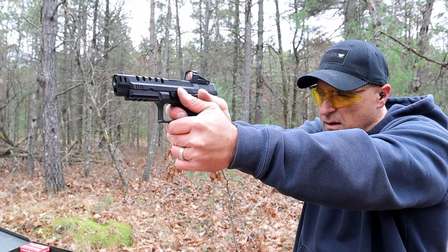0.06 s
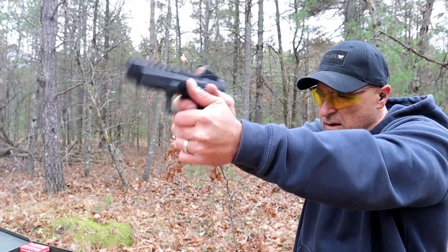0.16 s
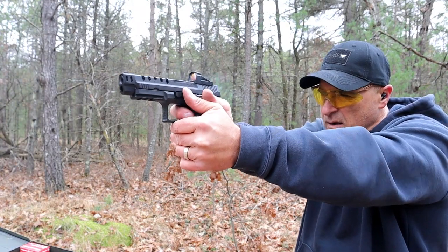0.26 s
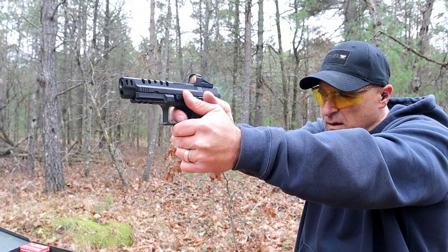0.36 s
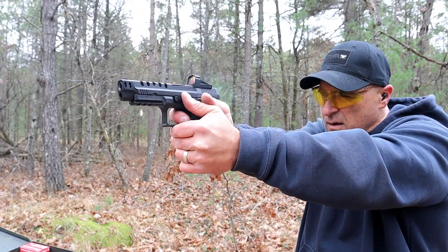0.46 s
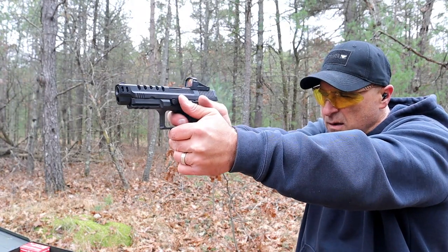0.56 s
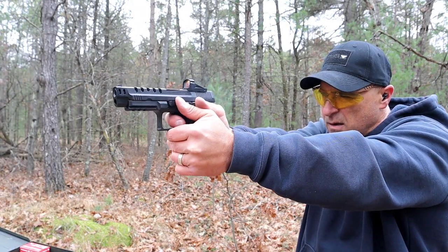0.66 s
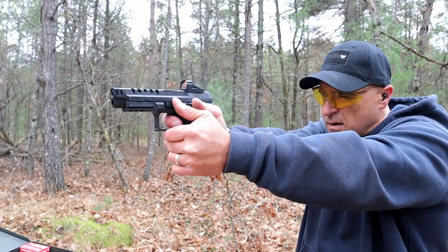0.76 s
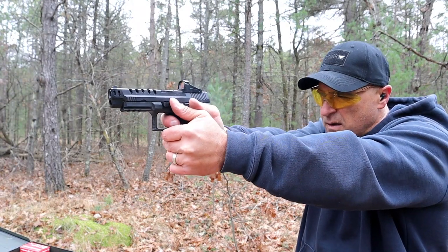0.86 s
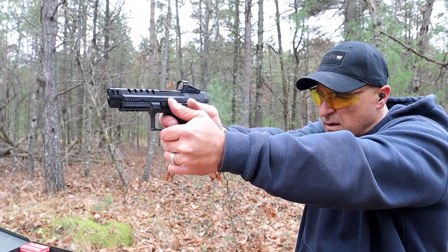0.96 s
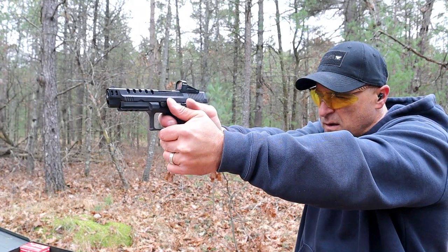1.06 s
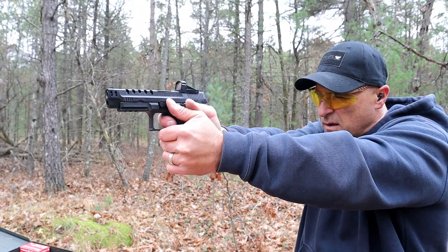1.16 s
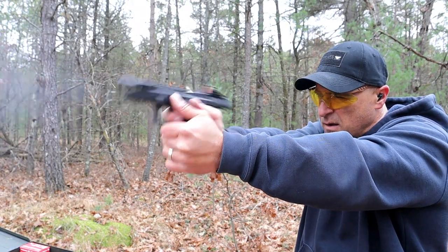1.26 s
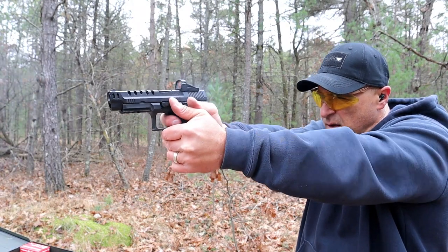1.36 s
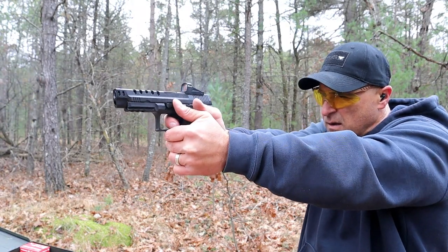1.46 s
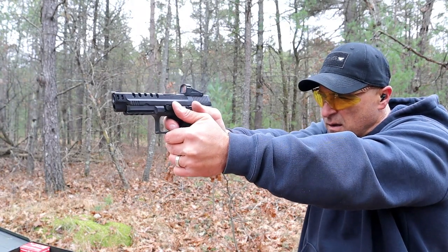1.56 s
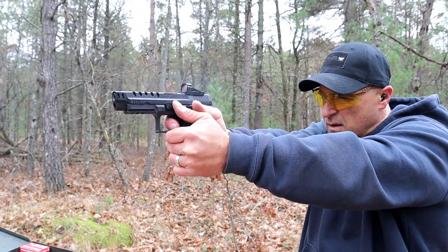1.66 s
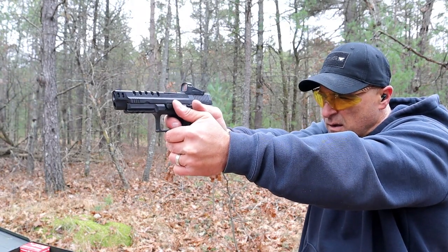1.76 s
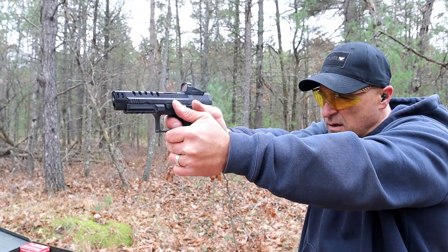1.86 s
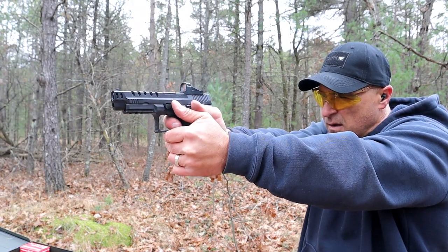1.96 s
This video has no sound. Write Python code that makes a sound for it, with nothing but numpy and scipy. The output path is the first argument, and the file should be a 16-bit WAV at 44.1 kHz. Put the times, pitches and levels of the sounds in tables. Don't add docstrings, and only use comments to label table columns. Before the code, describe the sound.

Two loud pistol shots, just over a second apart, crack close to an overloading microphone in the woods; each is followed by a slide clack, a bright steel plate ring and a long patchy echo.

```python
import sys
import numpy as np
from scipy import signal
from scipy.io import wavfile

SR = 44100
rng = np.random.default_rng(int(sys.argv[2]) if len(sys.argv) > 2 else 0)


def volts(x):
    e = np.asarray(x, float) / 20
    return 10 ** e


def persist_wave(psi):
    counts = np.round(np.clip(psi, -1, 1) * 32767).astype(np.int16)
    wavfile.write(sys.argv[1], SR, np.atleast_2d(counts).T)


N = 90405

# start in seconds, level of the forest echo in dB.
SHOTS = [
    (0.219, -12),
    (1.3685, -13),
]


def at_hz(points, hz):
    table_hz, values = np.transpose(points)
    return np.interp(np.log(hz), np.log(table_hz), values)


def since(start_s):
    t = np.arange(N) / SR - start_s
    return np.maximum(t, 0), t >= 0


def band(x, low_hz, high_hz):
    sos = signal.butter(3, [low_hz, min(high_hz, .45 * SR)], "band", fs=SR, output="sos")
    return signal.sosfilt(sos, x)


def drift(rate_hz):
    r = np.exp(-80 * np.pi * rate_hz / SR)
    chance = rng.standard_normal(N // 40 + 2002)
    slow = signal.lfilter([1], [1, -2 * r, r * r], chance)[2000:]
    return np.interp(np.arange(N) / 40, np.arange(len(slow)), slow / slow.std())


def coloured(spectrum, shape):
    edges = 25 * 2 ** np.arange(0, 9.8, .5)
    white = rng.standard_normal((2, N))
    centres = np.sqrt(edges[1:] * edges[:-1])
    gains = volts(at_hz(spectrum, centres))
    gains = gains / np.sqrt(np.sum(gains ** 2 * np.diff(edges)) / (SR / 2))
    out = np.zeros(N)
    for k, hz in enumerate(centres):
        out += gains[k] * band(white[k % 2] * shape(hz), edges[k], edges[k + 1])
    return out


def air():
    # pitch in Hz, level in dB per Hz.
    air_colour = [(30, -4), (100, 5), (1000, -32.5), (5000, -18.5), (15000, -28.5)]
    return volts(-68.5) * coloured(air_colour, lambda hz: 1)


def forest():
    # pitch in Hz, level in dB per Hz.
    forest_colour = [(60, -29), (200, -28), (450, -9.5), (1000, -8.5), (2000, -12.5), (4000, -16),
                     (8000, -16), (15000, -22)]
    # pitch in Hz, time to fall 60 dB in seconds.
    forest_t60 = [(80, 1.0), (250, 1.124), (700, 2.34), (2000, 1.356), (4000, 0.91), (8000, 0.64),
                  (11000, 0.55), (15000, .3)]
    # delay after the shot in seconds, level change in dB, width in
    # seconds.
    stands = [
        (.17, 0, 0.023),
        (0.218, 3, 0.021),
        (.43, -0.5, 0.056),
    ]
    earlier_shot = (-1.3, -11.5)  # s, dB; its echo still hangs in the trees
    far_db, far_stretch, far_cut_hz = -10.5, 2.69, 1220
    shared_patches = drift(42)

    def shape(hz):
        power = 0
        t60 = at_hz(forest_t60, hz)
        for start_s, db in [earlier_shot] + SHOTS:
            t, on = since(start_s)
            swell_db = sum(boost * np.exp(-.5 * ((t - lag) / width) ** 2) for lag, boost, width in stands)
            near = volts(-120 * t / t60)
            far = volts(2 * far_db - 120 * t / t60 / far_stretch) / (1 + (hz / far_cut_hz) ** 4)
            power = power + on * volts(2 * (db + swell_db)) * (near + far)
        return np.sqrt(power) * volts(0.94 * shared_patches + 1.3 * drift(5.9))

    return coloured(forest_colour, shape)


def ticks():
    # start in seconds, level in dB, centre pitch in Hz, length in seconds.
    tick_rows = [(0.073, -53, 12900, 0.0045), (.154, -51.5, 7500, 0.0054), (0.195, -55, 9800, 0.0026),
                 (.803, -51, 11100, .006), (0.89, -57, 12500, .003), (.931, -49, 5430, .004),
                 (.932, -58, 12000, 0.0035), (0.936, -37.5, 208, 0.018), (1.021, -53, 4600, .0015),
                 (1.487, -30, 10500, .04), (1.066, -47, 7000, .003), (1.141, -53, 9000, .004),
                 (1.162, -54, 10100, 0.0021), (1.187, -61, 11340, 0.0022), (1.210, -75, 12200, 0.0027),
                 (1.237, -48.5, 5970, 0.0046), (1.259, -57, 10900, .003), (1.293, -64, 7000, .003)]
    white = rng.standard_normal(N)
    out = np.zeros(N)
    for start_s, db, hz, length_s in tick_rows:
        t, on = since(start_s)
        burst = on * white * volts(db - 20 * t / length_s)
        out += band(burst + 1e-18, hz / 1.5, hz * 1.5) * np.sqrt(SR / hz / 2)
    return out


def blast():
    # pitch in Hz, level in dB per Hz.
    blast_colour = [(18, -35), (30, -20), (755, -3), (1060, -5), (2520, -6), (6480, -5), (12500, -13),
                    (15800, -25.5)]
    # pitch in Hz, time to fall 60 dB in seconds.
    blast_t60 = [(60, 0.019), (300, 0.055), (1000, 0.068), (3000, 0.04), (12000, 0.041)]
    # pitch in Hz, level in dB, time to fall 60 dB in seconds.
    boom_modes = [
        (546, 1.5, 0.12),
        (1062, 2, 0.1),
    ]
    blast_db = 17
    click_s, click_db, click_hz = .0014, -8, 2300

    def shape(hz):
        out = 0
        for start_s, _ in SHOTS:
            t, on = since(start_s)
            out = out + on * volts(blast_db - 60 * t / at_hz(blast_t60, hz))
        return out

    out = coloured(blast_colour, shape)
    for start_s, _ in SHOTS:
        t, on = since(start_s - click_s)
        click = on * (t < click_s) * np.sin(2 * np.pi * click_hz * t) * t / click_s
        out += volts(click_db) * click
        t, on = since(start_s)
        for hz, db, t60 in boom_modes:
            out += volts(db - 60 * t / t60) * np.sin(2 * np.pi * hz * t)
    return out


def slide():
    # start in seconds, level in dB.
    closings = [
        (0.2706, -19.5),
        (1.4174, -22),
    ]
    # pitch in Hz, level in dB, time to fall 60 dB in seconds.
    slide_modes = [(8270, 1, .012), (9600, -4, .008), (11140, -2, .01), (12950, -7, .012),
                   (13500, -10.5, .008), (14800, -10.5, .008)]
    contacts = [(0, 14), (.0012, -15), (.0032, -2.5)]
    out = np.zeros(N)
    for start_s, db in closings:
        for lag_s, contact_db in contacts:
            t, on = since(start_s + lag_s)
            for hz, mode_db, t60 in slide_modes:
                ring = np.sin(2 * np.pi * hz * t)
                out += on * volts(db + contact_db + mode_db - 60 * t / t60) * ring
    return out * 1.7


def slaps():
    # start in seconds, peak level in dB, pitch of the pulse in Hz (lower is duller).
    slap_rows = [(.2820, 1, 14000), (.2878, 7, 14000), (.2880, 4, 4000), (.2908, 1, 2000),
                 (1.4322, 4, 14000), (1.4324, 7, 4500)]
    out = np.zeros(N)
    for start_s, db, dull_hz in slap_rows:
        t, on = since(start_s)
        pulse = np.sin(np.pi * dull_hz * t - .6) * np.exp(-t * dull_hz / 2)
        out += on * volts(db) * pulse
    return band(out + 1e-18, 400, 19000)


def plates():
    hits_s = [
        .295,
        1.452,
    ]
    rises_s = [.06, .04]
    one_hz = [2065, 3381, 3483, 3865, 4753, 5229, 5955, 7185, 8053, 9394, 10890, 11560, 13470, 14360]
    two_hz = [2019, 2026.2, 3438, 3752, 5127, 7027, 8027, 8349, 9100, 10487, 11142, 13140, 14060, 15040]
    # level in dB, time to fall 60 dB in seconds,
    # beat of the swing in Hz, one of its quiet moments in seconds after the hit.
    plate_one = [(-22.5, 1.69, 2.45, 0.44), (-25.5, 0.61, 1.3, 0.32), (-36, 0.99, 1.9, 0.47),
                 (-26, 0.67, 0.51, 0.52), (-35, 0.61, 1.9, 0.35), (-12, 0.4, 6.3, 0.24),
                 (-20, 0.57, 7.7, 0.21), (-31, 0.59, 1.5, 0.36), (-43, 0.5, 1.6, 0.27),
                 (-35.5, 0.5, 1.3, 0.4), (-42, 0.38, 1.2, .4), (-39, 0.5, 1.5, 0.3), (-51, 0.45, 2.2, .2),
                 (-30, .3, 3.5, .014)]
    plate_two = [(-26.5, 4.4, 3.0, .2), (-20, 0.81, 5.0, 0.044), (-11.5, 0.66, 2.22, 0.028),
                 (-28, 0.54, 2.9, 0.26), (-21.5, 0.63, 4.9, 0.102), (-19, 0.51, 5.5, 0.135),
                 (-23.5, 0.43, 4.4, 0.11), (-16, 0.42, 2.1, 0.5), (-21, 0.45, 5.4, .15),
                 (-23.5, 0.34, 17, .09), (-18, 0.58, 7.4, 0.083), (-26.5, 0.54, 8.9, 0.88),
                 (-29.5, .45, 7.5, .085), (-50, .7, 3.06, 0.26)]
    pair_share, wobble_db = .7, 1.0
    scatter, scatter_per_khz = .15, .04
    linger_db, linger_stretch = -16, 2.0
    out = np.zeros(N)
    for hit_s, rise_s, pitches, modes in zip(hits_s, rises_s, [one_hz, two_hz], [plate_one, plate_two]):
        t, on = since(hit_s)
        for hz, (db, t60, beat_hz, null_s) in zip(pitches, modes):
            phase = 2 * np.pi * hz * t
            rate_hz = 4 + hz / 600
            ring = np.sin(phase) - pair_share * np.sin(phase + 2 * np.pi * beat_hz * (t - null_s))
            wavering = drift(rate_hz) * np.sin(phase) + drift(rate_hz) * np.cos(phase)
            ring += (scatter + scatter_per_khz * hz / 1000) * wavering
            swell = np.clip(t / (rise_s * rng.uniform(.6, 1.5)), 0, 1) ** 2
            fade = volts(-60 * t / t60) + volts(linger_db - 60 * t / t60 / linger_stretch)
            out += swell * volts(db + wobble_db * drift(rate_hz)) * ring * fade
    return out


def rustle():
    # start in seconds, level in dB, time to fall 60 dB in seconds.
    rustle_rows = [
        (1.025, -62, .2),
        (1.043, -47, .2),
    ]
    rustle_hz = 6500
    grains = rng.standard_normal(N) * volts(3.5 * drift(250))
    shape = np.zeros(N)
    for start_s, db, t60 in rustle_rows:
        t, on = since(start_s)
        shape += on * volts(db - 60 * t / t60)
    dulled = signal.lfilter([1], [1, -.4], grains * shape)
    return band(dulled + 1e-18, rustle_hz / 3.2, rustle_hz * 2.4)


def scene():
    surroundings = air() + forest()
    gun = blast() + slide() + slaps()
    return (surroundings + ticks() + gun + plates() + rustle())[None]


def top_cut(x):
    return signal.sosfilt(signal.butter(12, 15950, fs=SR, output="sos"), x)


def record(dry):
    duck_depth_db, attack_s, hold_s, release_s = -9.5, 0.0081, 0.077, 0.095
    thump_db, thump_hz, thump_t60_s = -16.5, 102.6, 0.069
    clip_top, hardness = 1.0, 3.3
    duck_db, thump = 0, 0
    for start_s, _ in SHOTS:
        t, on = since(start_s)
        recovery = np.clip((t - hold_s) / release_s, 0, 1)
        duck_db = duck_db + duck_depth_db * (1 - np.exp(-t / attack_s)) * (1 - recovery)
        thump = thump + volts(thump_db - 60 * t / thump_t60_s) * np.sin(2 * np.pi * thump_hz * t)
    x = signal.sosfilt(signal.butter(1, 70, "high", fs=SR, output="sos"), dry)
    x = x / (1 + np.abs(x / clip_top) ** hardness) ** (1 / hardness)
    x = x * volts(duck_db)
    x = signal.sosfilt(signal.butter(2, 30, "high", fs=SR, output="sos"), x) + thump
    x = signal.sosfilt(signal.cheby2(14, 50, 15950, fs=SR, output="sos"), x)
    return top_cut(np.clip(x, -1, 1))


dry = scene()
out = record(dry)
persist_wave(out)
```